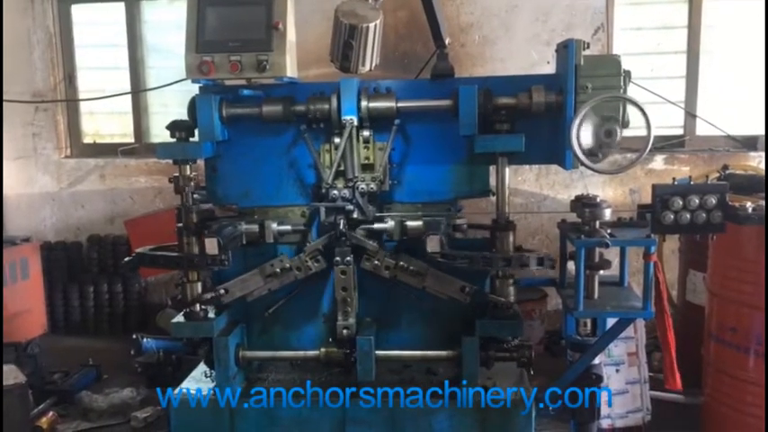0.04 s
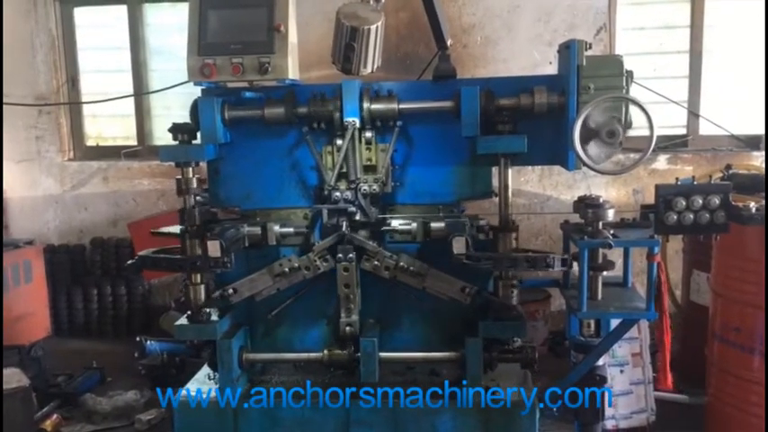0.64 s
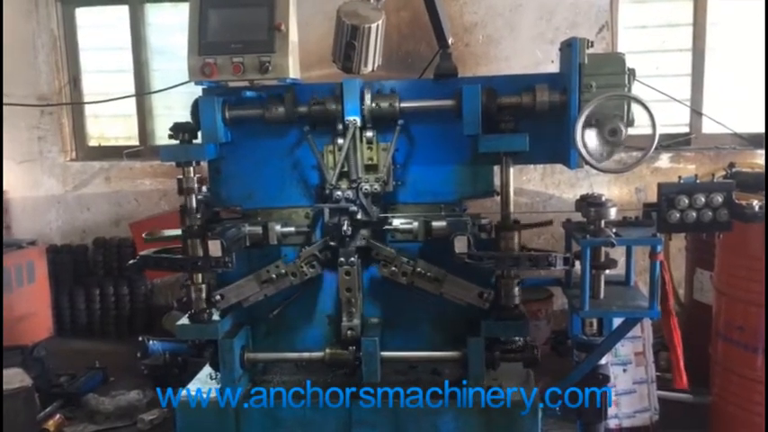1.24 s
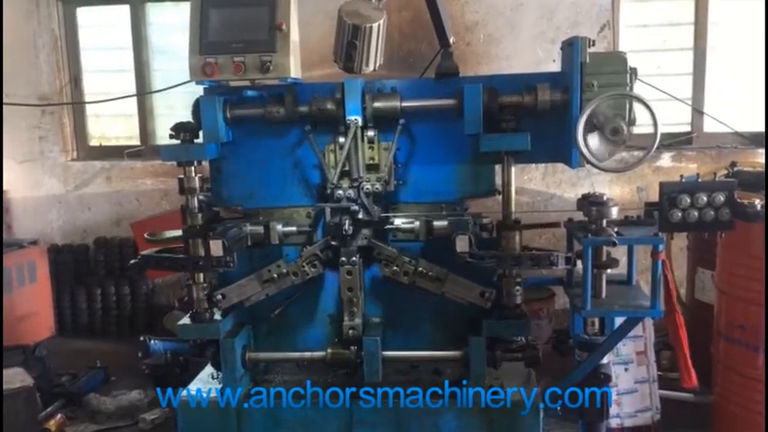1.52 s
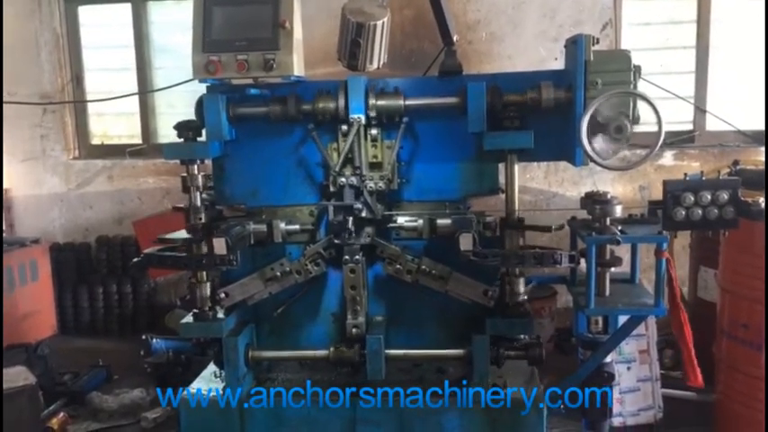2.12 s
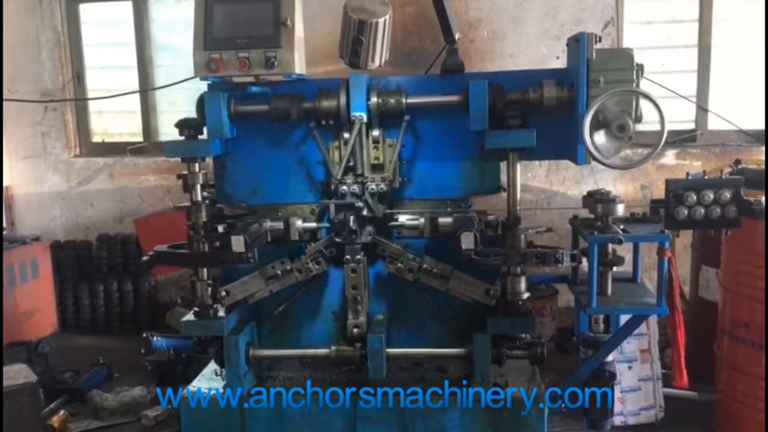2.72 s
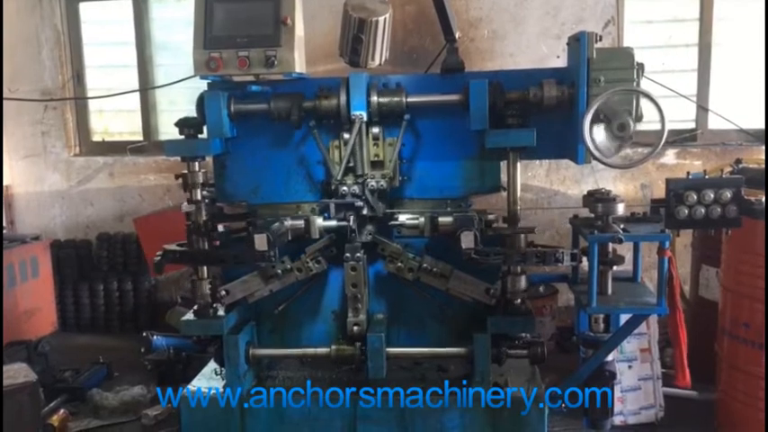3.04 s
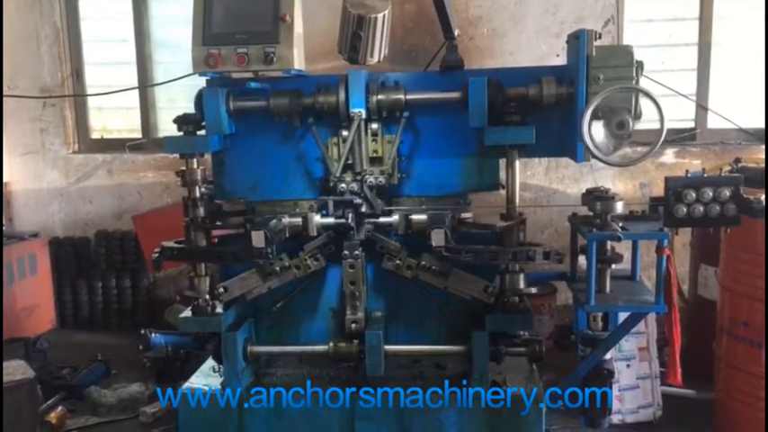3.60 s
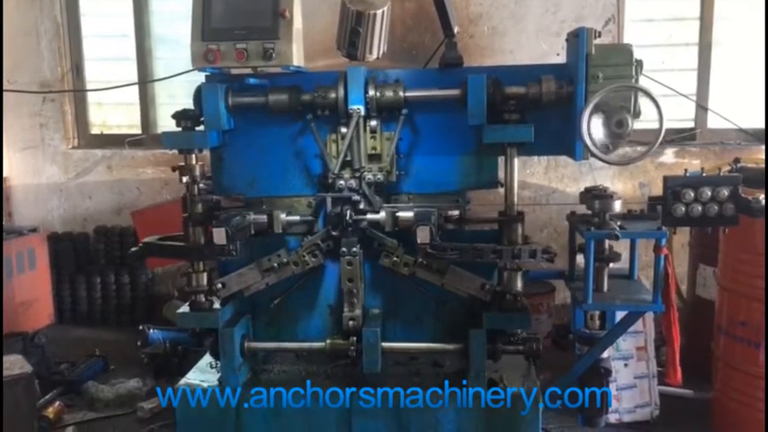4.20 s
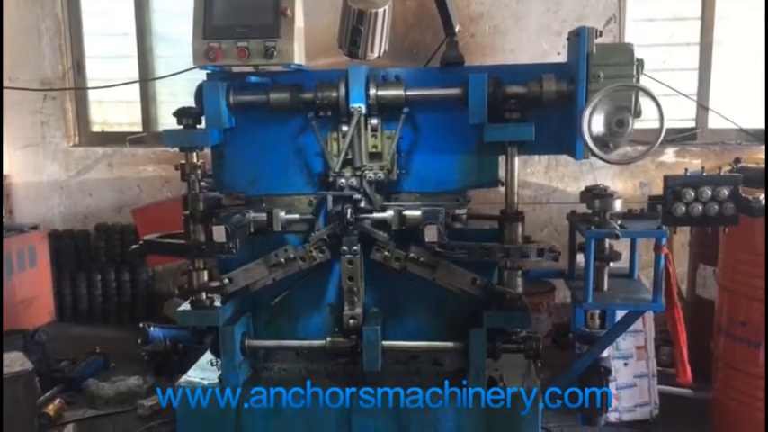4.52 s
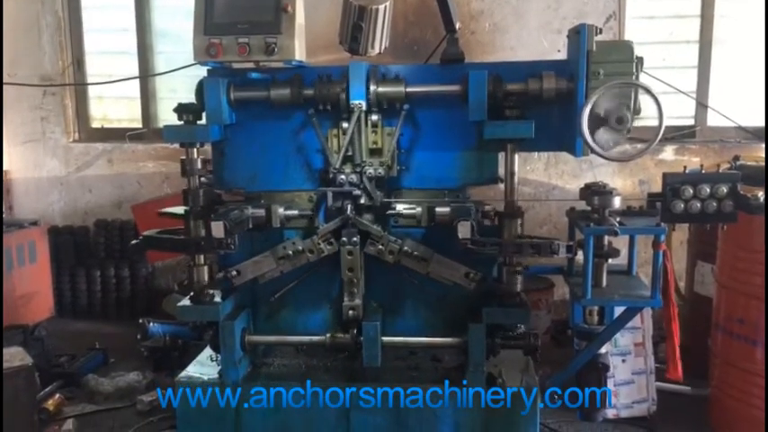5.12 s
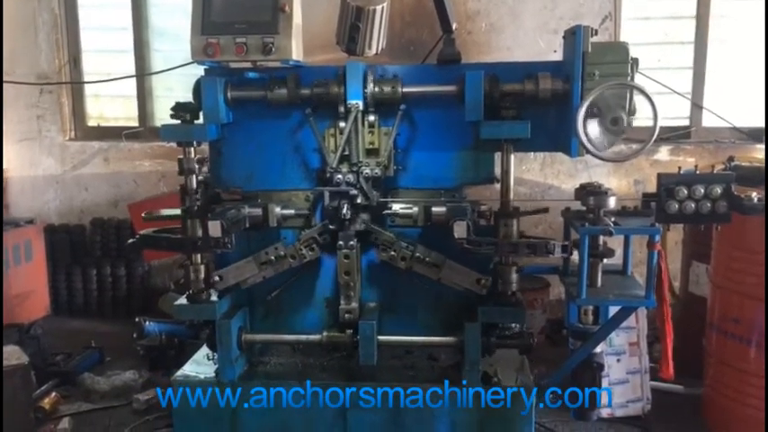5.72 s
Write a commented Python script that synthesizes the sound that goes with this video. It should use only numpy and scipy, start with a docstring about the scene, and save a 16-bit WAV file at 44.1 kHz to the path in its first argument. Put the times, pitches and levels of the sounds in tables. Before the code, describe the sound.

A wire forming machine hums and knocks in a workshop, with a brief scraping clatter ending in one sharp metallic blow.

```python
"""The frame of a cam-driven wire forming machine hums at a low resonance, while gear noise shakes its panels.
Slides strike the tools and excite their modes. Once, the wire is bent round the die in stick-slip
friction and cut with a sharp blow. A servo feeds wire in short moves, a clamp clicks, slides rub in
their guides, cam followers roll and switching tones beat into a thin whine. Blows, clicks and
scraping reverberate in a hard-walled workshop, heard from the front in mono."""
import sys
import numpy as np
from scipy import signal
from scipy.fft import rfft, irfft
from scipy.io import wavfile

SR = 44100
rng = np.random.default_rng(int(sys.argv[2]) if len(sys.argv) > 2 else 0)


def dump(signal):
    """Clip the signal to [-1, 1] and save it as 16-bit WAV at the path in sys.argv[1]."""
    limited = np.clip(np.atleast_2d(signal).T, -1, 1)
    pcm = np.round(limited * 32767).astype(np.int16)
    wavfile.write(sys.argv[1], SR, pcm)


N = 262395
TIME = np.arange(N) / SR
CUTOFF_HZ = 13900

# pushes that drive the frame into stronger vibration: start_s, end_s, level_db
FRAME_PUSHES = [(.315, .41, -11.5), (.46, .54, -13), (.78, 1.02, -20), (1.26, 1.47, -21.5),
                (1.56, 1.645, -19.5), (2.355, 2.395, -18), (2.638, 2.656, -14), (3.05, 3.5, -26),
                (3.64, 3.79, -16), (3.99, 4.08, -19.5), (4.58, 4.77, -19.5), (4.85, 4.94, -13.5),
                (5.03, 5.28, -17), (5.57, 5.69, -19.5)]
# cams taking up load: start_s, end_s, level_db
CAM_LOADS = [(.10, .30, -24.5), (.64, .95, -28.5), (1.48, 1.58, -26), (2.32, 2.40, -24), (2.635, 2.67, -23),
             (4.40, 4.73, -29.5), (4.86, 4.99, -24)]
# spectrum of the gear rumble: frequency_hz, level_db
RUMBLE_SPECTRUM = [(25, -48), (40, -18), (48, -0.5), (58, -17.5), (75, 5.5), (112, 9), (135, 2),
                   (170, -2.5), (225, 1.5), (300, -3.5), (400, -6), (600, -31), (1500, -59)]
# panel resonances stirred by the gears: pitch_hz, width_hz, level_db
PANEL_MODES = [(221.4, 13.4, -33), (311, 20.4, -38), (528.4, 12, -47), (620.5, 6.4, -45), (676, 49, -42.5),
               (845, 42, -48), (2246, 21, -55.5), (2890, 7.7, -61)]
# blows of the slides and cutter: start_s, low_db, middle_db, high_db, top_db, t60_s
BLOWS = [(.298, -18, -24.5, -39, -51, 0.066), (1.466, -22, -21.5, -32.5, -50, 0.036),
         (1.474, -27, -16, -33, -54, 0.056), (1.81, -23, -29.5, -29.5, -42, 0.071),
         (2.381, -32, -27, -18, -28, 0.11), (2.397, -32, -36, -23, -22.5, 0.071),
         (2.6118, -11.5, -11, -12.5, -13.5, 0.052)]
# the four bands of a blow: low_hz, high_hz
BLOW_BANDS = [(350, 1000), (1000, 2600), (2600, 6500), (6500, 14000)]
# response of the machine's body to a blow: frequency_hz, gain_db
BODY_RESPONSE = [(170, 4.5), (290, -12), (390, 8), (460, -3), (560, 5), (660, 6), (900, 4.5), (1600, -1),
                 (2100, 0.5), (2650, -4), (3200, 3.5), (4200, 2), (5300, 4.5), (7000, 0.5), (10300, -1.5),
                 (12000, 2)]
# modes of the tool plate: pitch_hz, level_db, t60_s
PLATE_MODES = [(422.2, -3, 0.37), (520, -16, 0.37), (854, 3.5, 0.23), (1220, -3.5, 0.6), (1476, -5, 0.2),
               (2270, 5, 0.14), (4680, -1, 0.092), (5470, 9, 0.058)]
# modes of the cutter block and the cut wire: pitch_hz, level_db, t60_s
CUTTER_MODES = [(386, -18.5, 0.23), (428, -16, 0.19), (521.3, -14, 0.3), (842, -25, 0.3), (915, -17.5, 0.2),
                (1224, -23.5, 0.22), (1425, -26, 0.25), (12500, -33, 0.25)]
# wire dragged through the die: start_s, end_s, level_db
WIRE_DRAGS = [(2.32, 2.36, -27.5), (2.39, 2.42, -22.5), (2.44, 2.49, -27.5), (2.551, 2.56, -27.5)]
# spectrum of that friction: frequency_hz, level_db
SCRAPE_SPECTRUM = [(150, -7), (390, 11.5), (530, 3), (900, 7.5), (2200, 1.5), (2650, -4), (3200, 4.5),
                   (4800, -3), (5700, -0.5), (6900, -3), (7700, -7), (9300, -2.5), (10500, -23),
                   (11700, -10), (14000, -38)]
# wire resonances at its changing free length: start_s, end_s, pitch_hz, level_db
WIRE_SQUEALS = [(2.321, 2.385, 6500, -30), (2.322, 2.385, 11300, -37), (2.398, 2.49, 9420, -33.5),
                (2.399, 2.601, 4630, -31), (2.551, 2.605, 8330, -33), (2.552, 2.605, 9430, -32.5),
                (2.555, 2.606, 12800, -32)]
# cracks as the wire gives way round the die: start_s, level_db
WIRE_CRACKS = [(2.3205, -19), (2.369, -22), (2.3835, -5.5), (2.399, -11), (2.416, -18), (2.423, -28),
               (2.443, -25), (2.458, -20), (2.551, -19)]
# presses of the bending tool: start_s, end_s, level_db
BENDER_PRESSES = [(2.315, 2.37, -29), (2.38, 2.46, -25.5)]
# resonances of the bending tool: pitch_hz, width_hz, level_db
BENDER_MODES = [(180, 95, -1.5), (300, 85, -5.5), (407, 64, -2), (1320, 130, -8), (2263, 35, -12)]
# slides clacking against their stops: start_s, level_db, pitch_hz
STOP_CLACKS = [(.299, -20.5, 2015), (1.474, -17, 2076), (4.718, -26, 1950), (4.798, -22.5, 1950),
               (4.866, -28.5, 1700)]
# covers booming after heavier knocks: start_s, level_db, pitch_hz
COVER_THUDS = [(1.51, -16, 219), (1.812, -20.5, 343.4), (1.815, -26, 1077)]
# contacts of the wire clamp: start_s, level_db, low_ring_db, high_ring_db
CLAMP_CLICKS = [(.927, -27, 0.5, -0.5), (1.411, -34, -12, -11), (5.472, -27.5, -4, -1)]
# modes of its steel jaws: pitch_hz, level_db, t60_s
JAW_MODES = [(2570, 3, 0.03), (2850, -6, .02), (3350, -3, 0.022), (4500, -10, 0.015), (5950, 0, 0.008),
             (6140, 1, 0.026), (6330, -1, 0.018)]
# slides running in their guides: middle_s, half_length_s, level_db
SLIDE_STROKES = [(0.48, 0.036, -38), (1.25, 0.05, -34), (3.366, 0.063, -32), (4.411, 0.08, -32),
                 (4.69, 0.17, -34), (4.923, 0.12, -33), (5.453, 0.098, -35), (5.797, 0.068, -38)]
# resonances of the rubbed guides: pitch_hz, width_hz, level_db
GUIDE_MODES = [(529, 9.6, -7.5), (547, 29, -8), (629, 11, -7), (694, 36, -3.5), (874, 19, -8.5),
               (1930, 400, -17), (2290, 250, -21.5)]
# spectrum of the slides' rattle: frequency_hz, level_db
RATTLE_SPECTRUM = [(500, -9), (1300, 25), (2000, 13), (2800, -3.5), (4500, -3), (8000, -21)]
# servo moves in one camshaft turn: start_s, end_s, whistle_db, lower_sideband_db, low_tone_db, hiss_db, rasp_db
FEED_MOVES = [(0.216, 0.623, -63, -60, -49.5, -45.5, -53), (0.912, 1.345, -66, -54, -56, -48, -60),
              (3.09, 3.617, -59.5, -55, -44, -38.5, -47), (3.613, 3.77, -55, -64, -56, -48, -60),
              (3.91, 4.432, -65, -64, -51, -42, -43.5), (4.44, 4.58, -59, -62, -55, -47, -50)]
# tones at and above the switching rate: offset_in_servo_multiples, level_db
SWITCHING_TONES = [(0, 11), (4, 7), (5, -1)]
# low tones at multiples of the servo rate, mirroring the sidebands of the switching rate: servo_multiple,
# level_db
SERVO_TONES = [(28, 0), (30, -9), (36, -8), (48, -9)]
# spectrum of wire hissing through the rolls: frequency_hz, level_db
HISS_SPECTRUM = [(300, -17), (1200, 9), (2200, 12), (2600, 8), (3100, 11), (4300, 8), (5500, 1), (7000, 8),
                 (8000, -38), (10000, -42), (13000, -21)]
# spectrum of followers rolling on their cams: frequency_hz, level_db
ROLLING_SPECTRUM = [(200, -20), (380, -0.5), (470, -3), (650, -1.5), (880, 5.5), (1050, -3.5), (1500, -7),
                    (2200, -9.5), (4000, -29.5), (9000, -53)]
# switching tones of the drive electronics: pitch_hz, level_db
WHINE_TONES = [(8845.8, -52.5), (8933.3, -50), (9020.8, -49), (9108.3, -55.5)]
# spectrum of the shop's background hiss: frequency_hz, level_db
AIR_SPECTRUM = [(100, -14.5), (1000, 7.5), (2100, 2), (2700, -1.5), (3500, 0), (4600, -5.5), (6500, -9.5),
                (8600, -9.5), (9500, -15), (10300, -39.5), (11300, -13.5), (12800, -22), (14000, -22)]
# reverberation time of the workshop: frequency_hz, t60_s
ROOM_DECAY = [(150, 0.93), (500, 0.74), (1500, 0.58), (4000, 0.61), (7000, 0.59), (13000, 0.2)]


def frame(load, hum_hz=92.86, wander_hz=2.62, hum_db=-4.0, rumble_db=-29.0, panel_db=-1.5):
    """Forced vibration: the frame sways at one low resonance; gear noise shakes it and its panels."""
    idle = from_db(-29 + 3.5 * drift(13.0))
    sway = np.hypot(idle, effort(FRAME_PUSHES, attack_s=0.0049, release_s=0.063))
    hum = from_db(hum_db) * sway * tone(hum_hz + wander_hz * drift(7.87))
    rumble = from_db(rumble_db) * load * noise(RUMBLE_SPECTRUM)
    panels = from_db(panel_db) * load ** 0.63 * driven_modes(PANEL_MODES)
    return hum + rumble + panels


def gear_load(idle_db=-28):
    """Power addition: the gain of the gear noise is 1 when idling and rises while a cam pushes."""
    return np.hypot(1, effort(CAM_LOADS, attack_s=0.0056, release_s=0.1) / from_db(idle_db))


def knocks(plate_db=-50):
    """Impact excitation: each blow is a short rattle filtered by the body; the tool plate rings on."""
    blows = np.zeros(N)
    low, high = np.transpose(BLOW_BANDS)
    for start, *band_db, t60 in BLOWS:
        density_db = np.array(band_db) - 10 * np.log10((high - low) / (SR / 2))
        centres = zip(np.sqrt(low * high), density_db)
        spectrum = [(100, density_db[0] - 13), *centres, (CUTOFF_HZ, density_db[-1] - 6)]
        add(blows, start, colour(burst(t60), spectrum))
    blows = colour(blows, BODY_RESPONSE)
    return blows + sum(from_db(db + plate_db) * ring(blows, hz, t60) for hz, db, t60 in PLATE_MODES)


def cutter(cut_s=2.6135):
    """Free vibration: the blade bottoms out, leaving a hollow note in its block, a thin one in the wire."""
    impulse = np.zeros(N)
    add(impulse, cut_s, np.ones(1))
    return sum(from_db(db) * ring(impulse, hz, t60) for hz, db, t60 in CUTTER_MODES)


def wire_bending(attack_s=0.0014, release_s=0.022, squeal_fade_db=9):
    """Stick-slip friction: the wire tightens, scrapes, squeals and cracks round the die; the tool groans."""
    slips = rng.standard_normal(N) * from_db(-0.5 * drift(130))
    squeals, cracks = np.zeros((2, N))
    for start, end, hz, db in WIRE_SQUEALS:
        progress = np.clip((TIME - start) / (end - start), 0, 1)
        grip = from_db(db - squeal_fade_db * progress) * swell(start, end, ramp_s=0.003)
        # random amplitude modulation widens the tone into a narrow band
        squeals += grip * drift(200) * tone(hz * (1 + 0.015 * drift(40)))
    for start, db in WIRE_CRACKS:
        add(cracks, start, from_db(db) * burst(t60=0.012))
    cracks = colour(cracks, [(600, -7), (2500, 2.5), (4800, 2.0), (7500, -16), (13000, -8)])
    groan = effort(BENDER_PRESSES, attack_s, release_s) * driven_modes(BENDER_MODES)
    tightening = from_db(-34) * swell(2.167, 2.48, ramp_s=0.17)
    drag = np.hypot(effort(WIRE_DRAGS, attack_s, release_s), tightening)
    scrape = drag * rms_one(colour(slips, SCRAPE_SPECTRUM))
    return scrape + squeals + cracks + groan


def loose_parts(strikes, t60, attack_s, wobble):
    """Damped oscillation: a struck part gives one note, whose pitch wobbles as it chatters in its seat."""
    notes = 0
    for start, db, hz in strikes:
        age = np.maximum(TIME - start, 0)
        rise = 1 - np.exp(-age / attack_s)
        decay = np.exp(-np.log(1000) * np.minimum(age / t60, 10))
        notes += from_db(db) * rise * decay * tone(hz * (1 + wobble * drift(hz / 10)))
    return notes


def clamp(ring_db=-24, tick_db=-5, split_hz=5000):
    """Modal excitation: steel jaws snap together and ring low or high according to where they meet."""
    contacts, low_drive, high_drive = np.zeros((3, N))
    for start, db, low_db, high_db in CLAMP_CLICKS:
        contact = from_db(db) * burst(t60=0.039)
        add(contacts, start, contact)
        add(low_drive, start, from_db(low_db) * contact)
        add(high_drive, start, from_db(high_db) * contact)
    ticks = colour(contacts, [(600, -35), (2500, 21.5), (7000, -7), (13000, 1.5)])
    jaws = sum(from_db(db) * ring(high_drive if hz > split_hz else low_drive, hz, t60)
               for hz, db, t60 in JAW_MODES)
    return from_db(tick_db) * ticks + from_db(ring_db) * jaws


def slides(rattle_db=-13, rattles_per_s=350):
    """Sliding friction: each stroke rubs the guides into a hollow groan, and the play in them rattles."""
    rub = sum(from_db(db) * np.exp(-((TIME - middle) / half) ** 2) for middle, half, db in SLIDE_STROKES)
    touches = (rng.random(N) < rattles_per_s / SR) * rng.standard_normal(N)
    chatter = signal.fftconvolve(touches, burst(t60=0.012))[:N]
    rattle = rms_one(colour(chatter, RATTLE_SPECTRUM))
    return rub * (driven_modes(GUIDE_MODES) + from_db(rattle_db) * rattle)


def servo_feed(full_speed_hz=105.25, switching_hz=8000, cycle_s=4.544, ramp_s=0.1):
    """Modulation: sidebands of the switching tone, high and low, follow the servo's speed; wire hisses and
    rasps in the rolls."""
    moves, pull = np.zeros((len(FEED_MOVES), N)), np.zeros(N)
    for move, (start, end, *_) in zip(moves, FEED_MOVES):
        for turn_s in (0, cycle_s):  # the moves recur after one turn of the camshaft
            move += swell(start + turn_s, end + turn_s, ramp_s)
            pull += swell(start + turn_s, end + turn_s, (end - start) / 2)
    gains = from_db(np.array(FEED_MOVES)[:, 2:].T) @ moves ** 2
    whistle_gain, lower_gain, low_gain, hiss_gain, rasp_gain = gains
    speed = moves.sum(axis=0)
    servo_hz = full_speed_hz * speed
    whistle = whistle_gain * sum(from_db(db + 2.3 * drift(40)) * tone(switching_hz + k * servo_hz)
                                 for k, db in SWITCHING_TONES)
    lower_sideband = lower_gain * tone(switching_hz - 4 * servo_hz)
    low_tones = low_gain * sum(from_db(db + 1.5 * drift(40)) * tone(k * servo_hz * (1 + 0.002 * drift(40)))
                            for k, db in SERVO_TONES)
    roughness = from_db(drift(80))
    hiss = hiss_gain * np.sqrt(pull) * noise(HISS_SPECTRUM)
    rasp = rasp_gain * resonant(hz=2200, width_hz=330)
    # the steep power lets the low tones sing only near full speed
    return speed ** 2 * (whistle + lower_sideband) + speed ** 10 * low_tones + roughness * (hiss + rasp)


def cam_followers(load, level_db=-36.5, uneven_db=2.0):
    """Rolling contact: followers run unevenly on their cams, slightly louder under load."""
    return from_db(level_db + uneven_db * drift(28)) * load ** 0.043 * noise(ROLLING_SPECTRUM)


def drive_whine(gain_db=-3.7, rise_db_per_s=0.5, waver_db=0.6, slip_rad=0.7):
    """Beating: closely spaced switching tones, nearly in step, make a thin buzz that slowly grows."""
    tones = sum(from_db(db) * np.sqrt(2) * np.sin(2 * np.pi * hz * TIME + slip_rad * drift(1))
                for hz, db in WHINE_TONES)
    return from_db(gain_db + rise_db_per_s * TIME + waver_db * drift(1.2)) * tones


def shop_air(level_db=-39.0, flicker_db=1.5):
    """Ambient noise: a broadband hiss whose level flickers slightly."""
    return from_db(level_db + flicker_db * drift(21)) * noise(AIR_SPECTRUM)


def workshop(x, build_s=0.0059, size=40000):
    """Reverberation: diffuse reflections build up quickly and die sooner in the treble."""
    t, tail = np.arange(size) / SR, np.zeros(size)
    edges_hz = np.geomspace(90, 16000, 9)
    for low, high in zip(edges_hz, edges_hz[1:]):
        bandpass = signal.butter(2, [low, high], "band", fs=SR, output="sos")
        decay = np.exp(-np.log(1000) * t / at_hz(ROOM_DECAY, np.sqrt(low * high)))
        tail += signal.sosfilt(bandpass, rng.standard_normal(size)) * decay
    tail *= 1 - np.exp(-t / build_s)
    tail = colour(tail, [(200, 5), (520, 8), (650, -1), (850, 3), (1050, 0), (1350, 4.5),
                         (4500, 3.0), (8000, -2), (12000, 1)])
    return signal.fftconvolve(x, tail / np.sqrt(np.sum(tail ** 2)))[:N]


def from_db(db):
    """Amplitude ratio of a level in decibels."""
    return 10 ** (np.asarray(db) / 20)


def rms_one(x):
    """Normalisation to unit power."""
    return x / np.sqrt(np.mean(x ** 2) + 1e-20)


def at_hz(points, hz):
    """Interpolation of (frequency_hz, value) rows on a log-frequency axis."""
    frequencies, values = np.transpose(points)
    return np.interp(np.log(np.maximum(hz, 1)), np.log(frequencies), values)


def colour(x, points, size=8192):
    """Minimum-phase filtering with a (frequency_hz, gain_db) response."""
    gain = from_db(at_hz(points, np.fft.rfftfreq(size, 1 / SR)))
    cepstrum = irfft(np.log(gain))
    cepstrum[1:size // 2] *= 2  # folding the cepstrum makes the filter causal
    cepstrum[size // 2 + 1:] = 0
    return signal.fftconvolve(x, irfft(np.exp(rfft(cepstrum))))[:len(x)]


def noise(spectrum, size=8192):
    """Stationary noise of a given spectrum; rms 1."""
    return rms_one(colour(rng.standard_normal(N + size), spectrum)[size:])


def drift(rate_hz, step=40):
    """Random fluctuation: noise low-passed at rate_hz; rms 1."""
    pole = np.exp(-2 * np.pi * step * rate_hz / SR)
    white = rng.standard_normal(N // step + 2002)
    slow = signal.lfilter([1], [1, -2 * pole, pole * pole], white)[2000:]
    return np.interp(np.arange(N) / step, np.arange(len(slow)), rms_one(slow))


def tone(hz):
    """Sinusoid whose phase is the integral of a frequency curve; rms 1."""
    cycles = np.cumsum(hz * np.ones(N)) / SR + rng.random()
    return np.sqrt(2) * np.sin(2 * np.pi * cycles)


def ring(x, hz, t60):
    """Damped resonator: a unit impulse starts a decaying sine of height 1."""
    radius, angle = np.exp(-np.log(1000) / (t60 * SR)), 2 * np.pi * hz / SR
    return signal.lfilter([0, np.sin(angle)], [1, -2 * radius * np.cos(angle), radius ** 2], x + 1e-18)


def resonant(hz, width_hz):
    """Random excitation of one resonance; rms 1."""
    return rms_one(ring(rng.standard_normal(N), hz, t60=np.log(1000) / (np.pi * width_hz)))


def driven_modes(modes):
    """Superposition of noise-driven resonances at (pitch_hz, width_hz, level_db) rows."""
    return sum(from_db(db) * resonant(hz, width_hz) for hz, width_hz, db in modes)


def burst(t60, size=16384):
    """Exponentially decaying noise: the dense contacts of metal chattering on metal."""
    return rng.standard_normal(size) * np.exp(-np.log(1000) * np.arange(size) / SR / t60)


def swell(start, end, ramp_s):
    """Envelope with quarter-sine ramps, rising after start and falling before end."""
    return np.sin(np.pi / 2 * np.clip(np.minimum(TIME - start, end - TIME) / ramp_s, 0, 1))


def effort(pushes, attack_s, release_s):
    """Joint gain of (start_s, end_s, level_db) pushes that build, hold and decay, adding in power."""
    power = 0
    for start, end, db in pushes:
        rise = 1 - np.exp(-np.maximum(TIME - start, 0) / attack_s)
        fall = np.exp(-np.maximum(TIME - end, 0) / release_s)
        power += (from_db(db) * rise * fall) ** 2
    return np.sqrt(power)


def add(track, start_s, sound):
    """Superposition of a sound on a track from start_s."""
    start = round(start_s * SR)
    track[start:start + len(sound)] += sound[:N - start]


def scene():
    """Direct and reverberant sound: the machine runs while its blows, clicks and wire excite the room."""
    blows = knocks() + cutter()
    clicks = clamp()
    wire = wire_bending()
    clacks = loose_parts(STOP_CLACKS, t60=0.03, attack_s=0.0006, wobble=0.22)
    thuds = loose_parts(COVER_THUDS, t60=0.47, attack_s=0.0097, wobble=0.0594)
    reverberation = workshop(from_db(-5.5) * blows + from_db(-2) * clicks + from_db(-10) * wire)
    load = gear_load()
    running = frame(load) + cam_followers(load) + shop_air() + slides() + drive_whine() + servo_feed()
    return (running + blows + clacks + thuds + clicks + wire + reverberation)[None, :]


def record(dry, ceiling=0.78):
    """Saturation rounds the loudest peaks, and a steep low-pass filter removes the top of the treble."""
    saturated = dry / (1 + (dry / ceiling) ** 4) ** 0.25
    lowpass = signal.ellip(10, 0.2, 80, CUTOFF_HZ, fs=SR, output="sos")
    return signal.sosfilt(lowpass, saturated)


dry = scene()
out = record(dry)
dump(out)
```